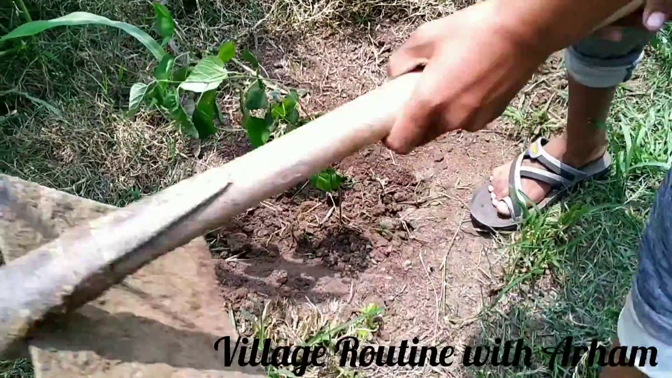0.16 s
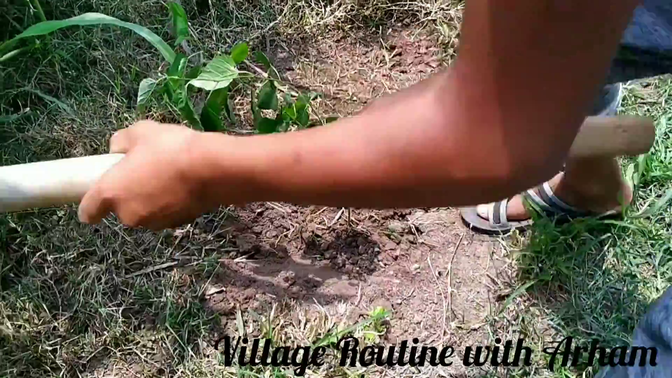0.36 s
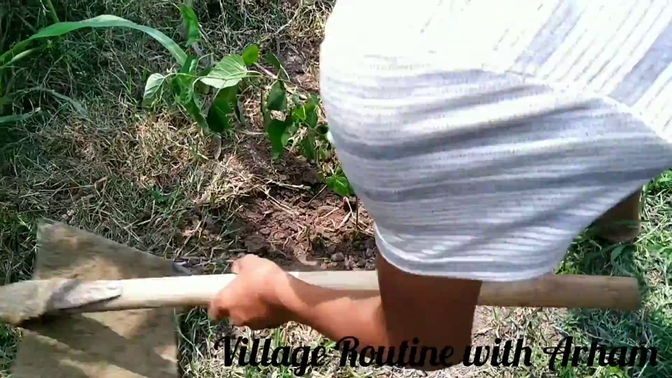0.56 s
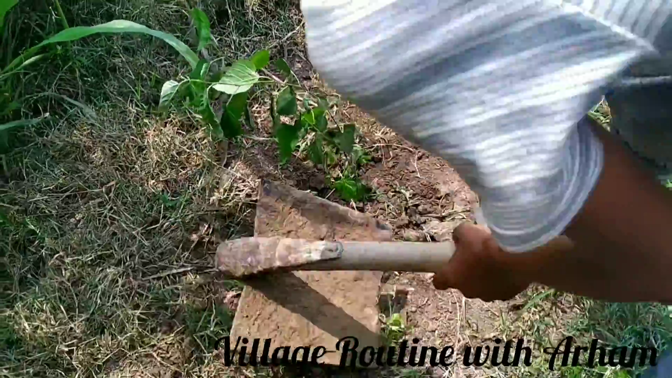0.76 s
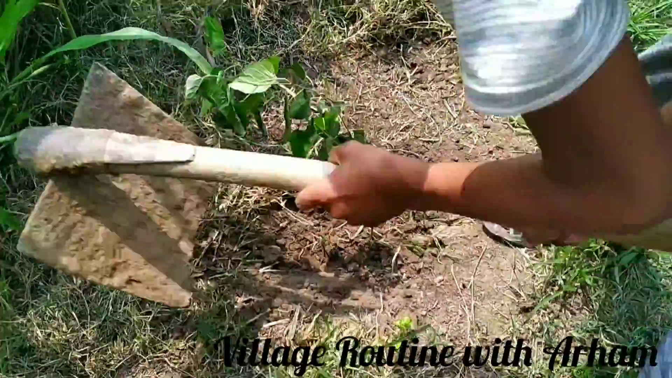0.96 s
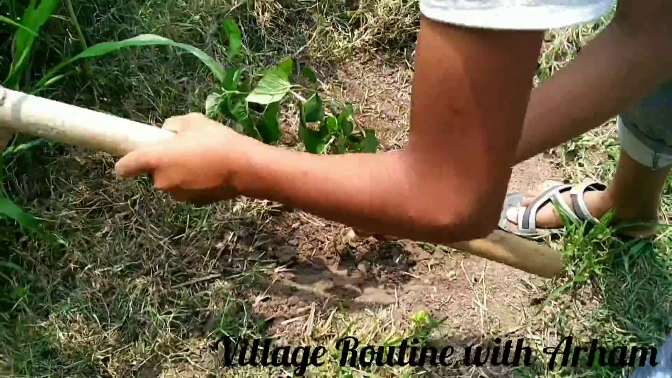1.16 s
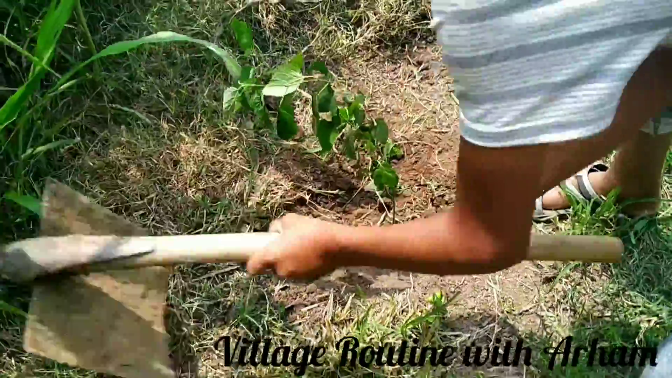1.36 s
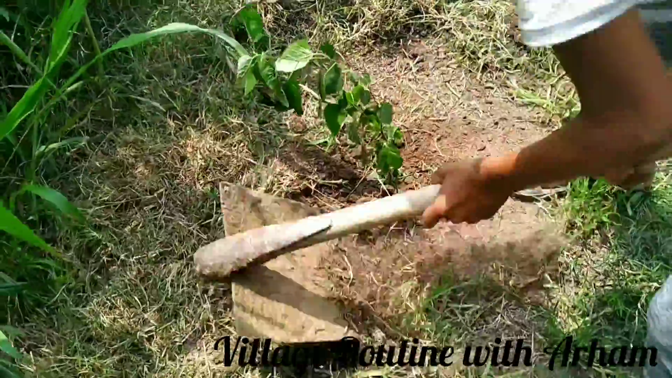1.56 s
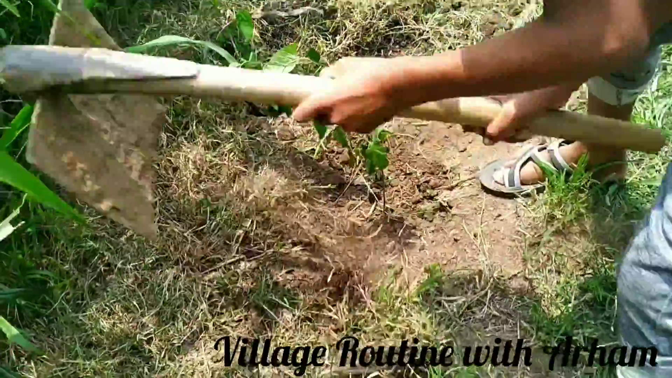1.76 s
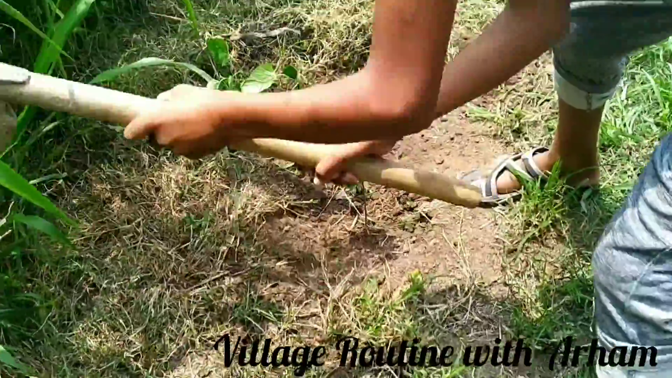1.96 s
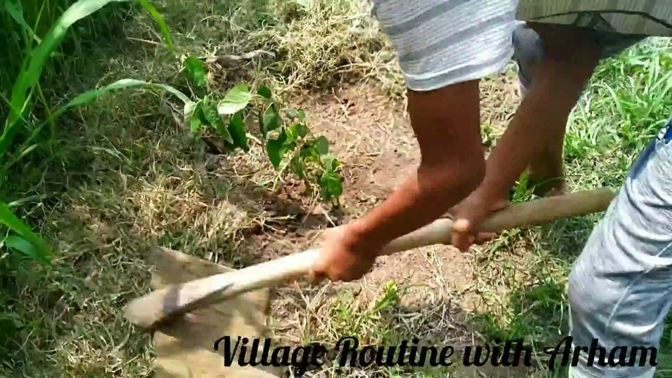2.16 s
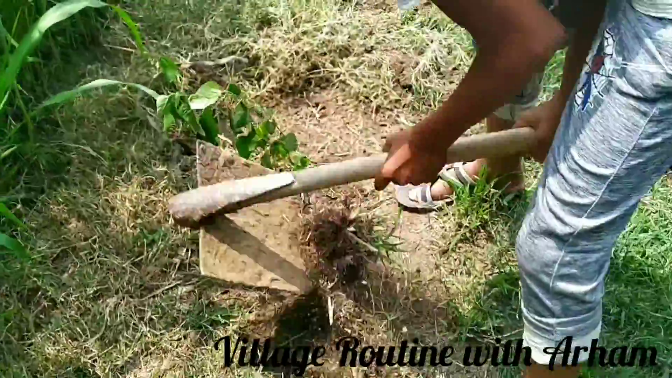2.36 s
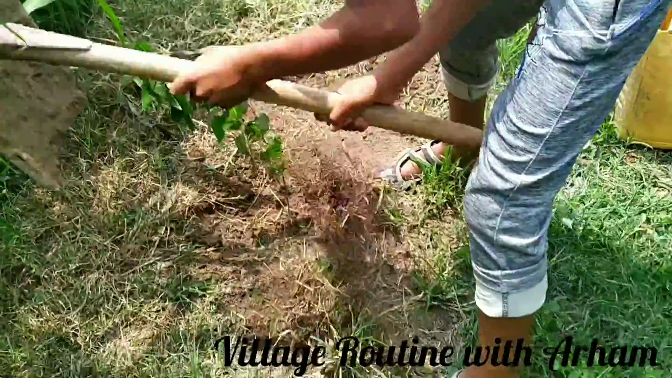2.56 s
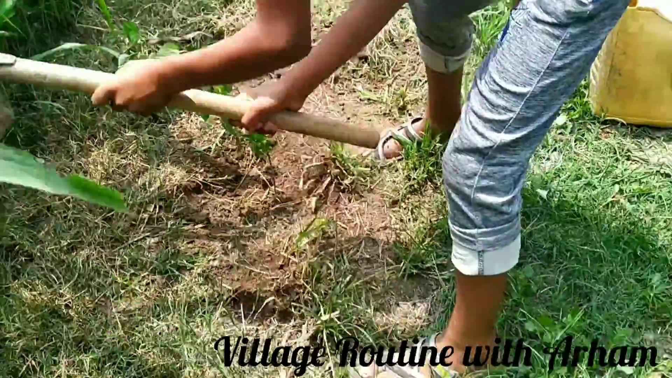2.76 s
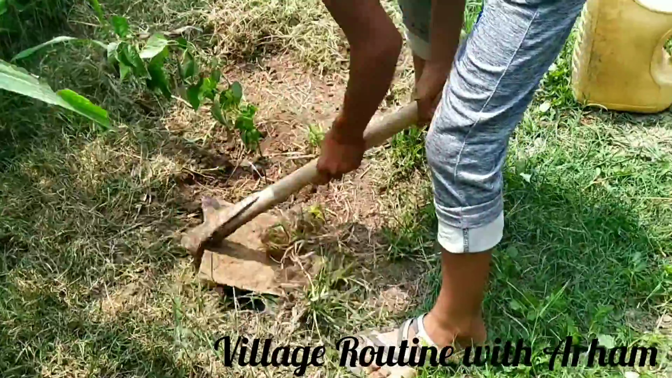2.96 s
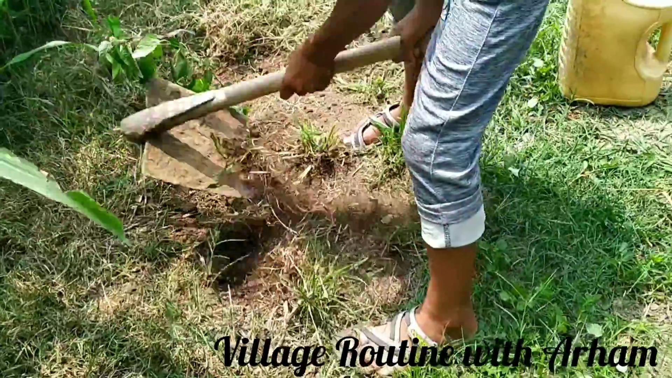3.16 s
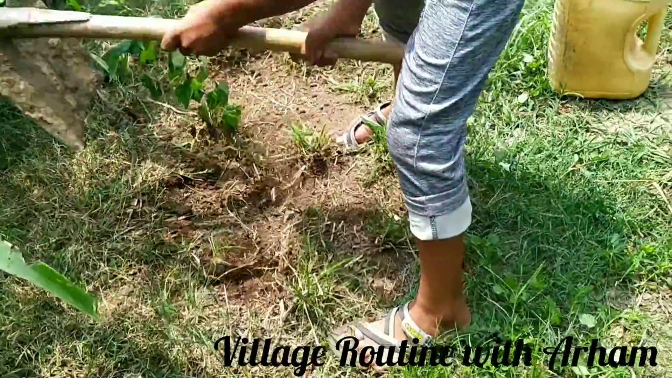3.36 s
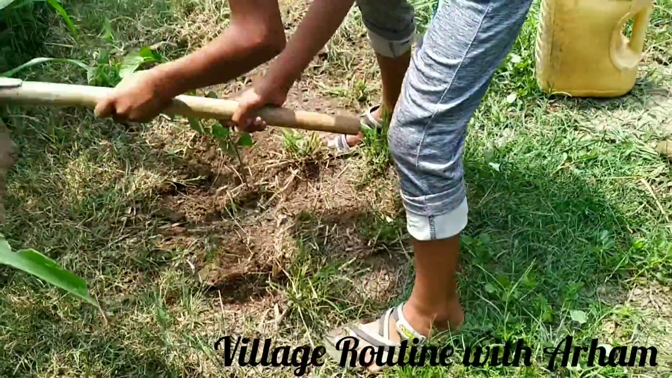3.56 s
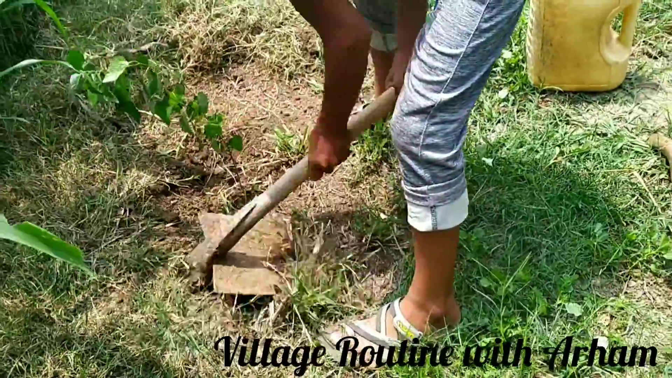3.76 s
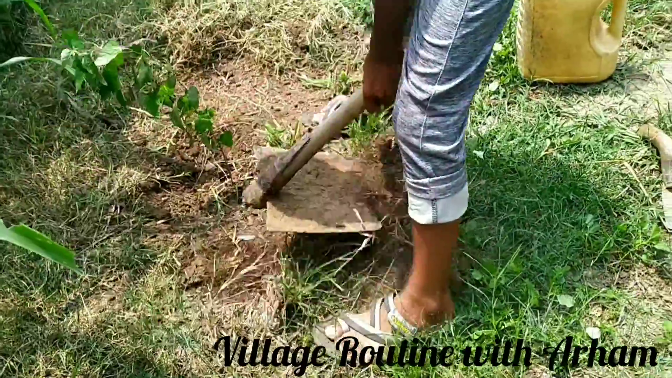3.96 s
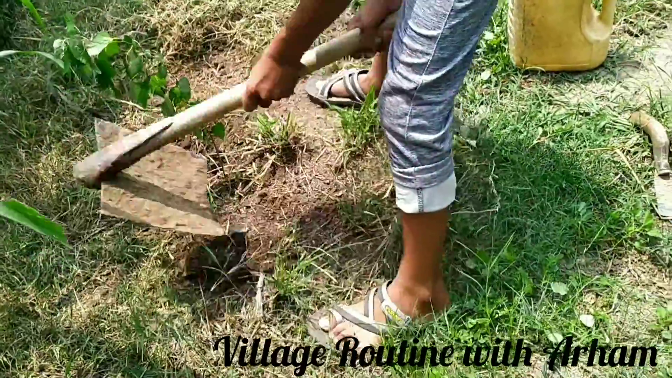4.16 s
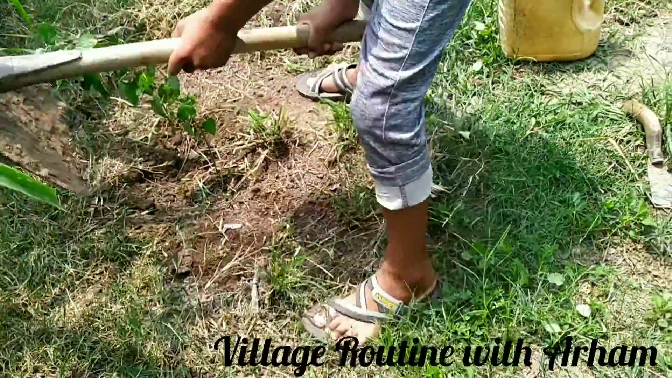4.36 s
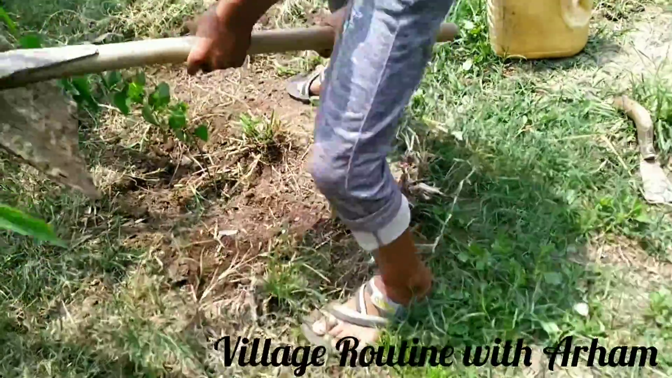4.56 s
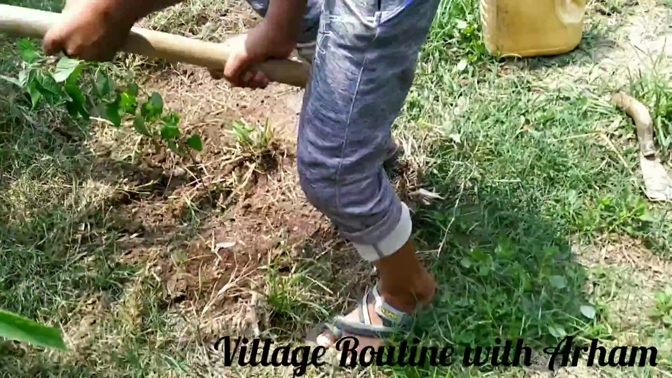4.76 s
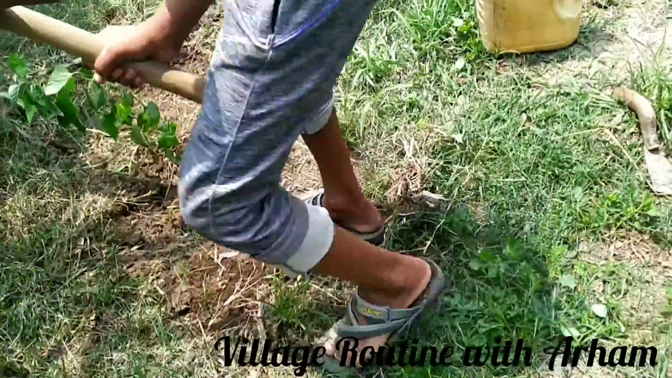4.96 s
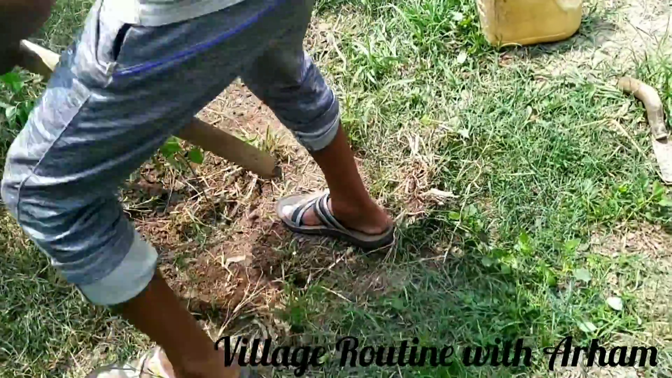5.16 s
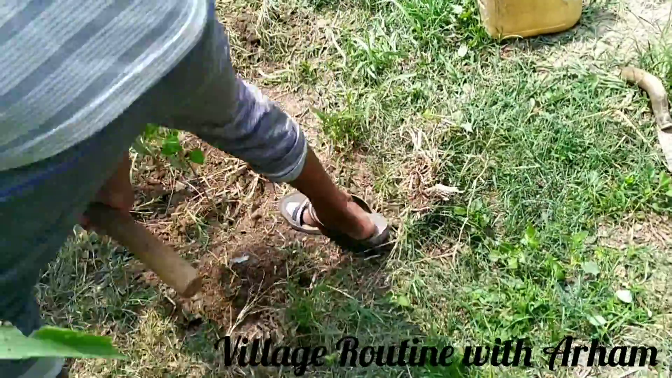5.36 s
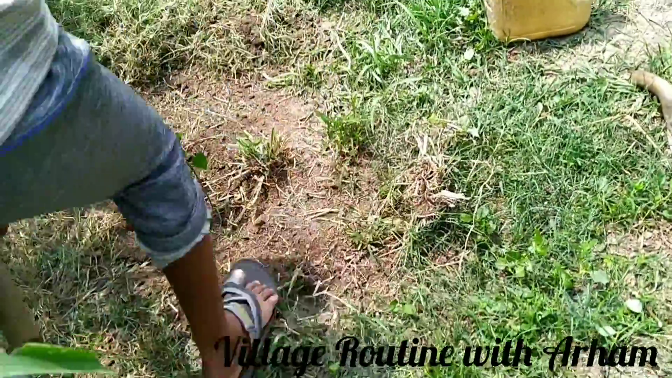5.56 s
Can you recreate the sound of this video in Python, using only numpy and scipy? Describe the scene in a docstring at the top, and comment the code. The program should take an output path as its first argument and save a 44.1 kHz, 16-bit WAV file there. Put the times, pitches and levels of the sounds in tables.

```python
"""A hand hoe chops five times into dry, grassy soil, close by and outdoors.
Each stroke swishes through the grass, crunches in with a dull thud, cracks the soil and throws earth.
The crunch is a crowd of tiny clicks, one for each break in the soil, and it makes the hoe ring briefly.
Sandals shuffle, dry grass rustles throughout, and there is a thin, high rasp like insects.
Far off, a slow one-cylinder engine thumps, one puff for each firing, over the rumble of the air."""
import sys
import numpy as np
from scipy import signal
from scipy.fft import rfft, irfft, next_fast_len
from scipy.io import wavfile
from scipy.ndimage import uniform_filter1d

SR = 44100
rng = np.random.default_rng(int(sys.argv[2]) if len(sys.argv) > 2 else 0)


def to_wav(s):
    """Save 16-bit WAV."""
    ch = np.atleast_2d(s).T  # columns
    pcm = np.round(np.clip(ch, -1, 1) * 32767)  # PCM
    wavfile.write(sys.argv[1], SR, pcm.astype(np.int16))


N = 246959
T, HZ = np.arange(N) / SR, np.fft.rfftfreq(N, 1 / SR)

# The blade bites and opens a small hollow. Each row: time in seconds, then
# the crunch's level in dB, rise and fall in seconds, brightness in dB per octave and top fizz in dB;
# the thud's level in dB, pitch in Hz, fall and delay in seconds;
# the ground's push in dB, pitch in Hz and heave in dB;
# the swish's level in dB, head start and build-up in seconds;
# the cut's lower resonance in Hz and its height in dB, its upper resonance in Hz and its height in dB;
# the place of a dip in the spectrum in Hz, and the gain of the hoe's ring in dB.
STROKES = [(0.661, -20, 0.008, 0.016, 1.5, 5.5, -21, 530, 0.00085, 0.00026, -45, 297, -50, -26.5, 0.027, 0.0085, 750, 10, 970, 13, 3380, -65),
           (1.486, -15.5, 0.0094, 0.0055, 2.5, -2, -19.5, 684, 0.004, 0.001, -22, 370, -28.5, -28, 0.043, 0.02, 455, 11, 2200, -6, 1810, -51.5),
           (2.247, -14.5, 0.0034, 0.011, 3, -1, -20.5, 566, 0.0086, 0.001, -31.5, 262, -37, -24.5, 0.071, 0.05, 370, -6, 1270, 8, 3300, -53),
           (2.997, -15.5, 0.0048, 0.008, 2.3, -4, -25, 372, 0.0062, 0.002, -34, 237, -34, -33, 0.067, 0.059, 534, 11.5, 1100, 9, 3350, -64),
           (3.799, -17.5, 0.0028, 0.012, 2.5, -1, -24, 560, 0.0068, 0.00066, -22.5, 301, -34, -29, 0.037, 0.018, 375, 16, 1350, 8.5, 2980, -74)]
# The tones of the steel blade on its wooden handle, damped by the soil.
# Each row: pitch in Hz, relative level in dB, seconds to fade by 60 dB.
HOE_TONES = [(373, 2, 0.16), (539, 2, 0.26), (840, 5, 0.14), (1104, -3, 0.062), (2520, 4, 0.03),
             (7370, 26.5, 0.0084)]
# Sharp cracks of dry soil as the blade bites in or breaks off clods.
# Each row: time in seconds, snap level in dB, snap fall in seconds, crumble level in dB,
# crumble fall in seconds, brightness in dB per octave, the gap's resonance in Hz, its height in dB.
SOIL_CRACKS = [(0.704, -33, 0.0035, -36.5, 0.015, 0.5, 990, 2),
               (0.737, -44, 0.003, -40.5, 0.019, 0.5, 850, 2),
               (1.514, -39, 0.003, -38, 0.015, -2.5, 560, 2),
               (1.533, -28, 0.0035, -30.5, 0.012, 1.4, 550, 9.5),
               (1.548, -37, 0.002, -43.5, 0.021, -2, 700, 7),
               (2.2685, -20.5, 0.0015, -35, 0.011, -0.7, 350, 2.5),
               (2.9935, -22, 0.0025, -37, 0.0091, -0.5, 1290, 8),
               (3.038, -24.5, 0.0054, -33, 0.017, 2.5, 1420, 5),
               (3.056, -36, 0.0022, -35, 0.013, 2, 1350, 8), (3.8214, -22, 0.0019, -33, 0.0071, 2, 1400, 3)]
# Showers of thrown earth. Each row: time of the peak in seconds, relative level in dB.
EARTH_SHOWERS = [(0.95, -56), (1.7, -54), (2.682, -54.5), (3.479, -48.5), (4.051, -45.5)]
# Hoe and sandals tap the ground. Each row: time in seconds, level in dB, rise and fall in seconds.
GROUND_TAPS = [(0.378, -33, 0.00068, 0.0024), (0.386, -32, 0.0031, 0.0036), (1.252, -46, 0.0014, 0.0046),
               (1.949, -45, 0.0016, 0.005), (4.891, -40, 0.0059, 0.0045)]
# Sandals and blade brush the grass.
# Each row: time in seconds, level in dB, rise and fall in seconds, brightness in dB per octave.
GRASS_SCUFFS = [(0.376, -39.5, 0.017, 0.014, -2.5), (0.446, -32, 0.0019, 0.0091, 12),
                (1.10, -39.5, 0.022, 0.025, 1), (3.255, -38, 0.01, 0.031, 6),
                (4.44, -40, 0.033, 0.029, -1.5), (4.69, -48, 0.0088, 0.0057, -1),
                (4.808, -40.5, 0.0061, 0.025, 0), (4.89, -41.5, 0.012, 0.019, -0.5),
                (5.297, -33.5, 0.019, 0.032, 4), (5.555, -38, 0.027, 0.035, 1.5)]
# How loud the rustle and the high rasp are over time. Each row: time in seconds, relative level in dB.
RUSTLE_LEVELS = [(0.27, -57.5), (0.42, -47.5), (0.6, -54), (2.1, -52), (2.9, -47), (3.7, -53.5),
                 (4.3, -51.5), (4.55, -44.5), (4.75, -50), (5.13, -51), (5.35, -47.5)]
RASP_LEVELS = [(0.15, -70), (0.5, -54), (0.8, -55.5), (1.35, -55), (1.85, -67), (2.05, -58), (2.55, -62),
               (3.3, -60), (4.3, -65), (5.5, -58)]
# The paths of the engine's sound across the field. Each row: delay in seconds, relative level in dB.
ENGINE_PATHS = [(0, 4.5), (0.0184, -4.5), (.0285, -49), (0.053, -7), (0.07, -7), (.084, -16)]
# The tone colour of breaking soil, falling crumbs, dry grass and outdoor air.
# Each row: frequency in Hz, relative level in dB.
SOIL_SPECTRUM = [(60, -12), (180, 0.5), (330, 5), (680, 5), (880, 1), (1100, 4), (1400, 3.5), (2000, -1),
                 (3200, -2), (4600, -2), (6000, -1), (7400, -2), (8200, -0.5), (9300, -6), (11500, -14),
                 (15500, -9)]
PATTER_SPECTRUM = [(200, -10), (700, -6.5), (2000, 0.5), (3000, 0.5), (4000, 3), (7500, 2), (9500, -6.5),
                   (15500, -8)]
GRASS_SPECTRUM = [(150, -7.5), (500, -7), (1000, -8), (1900, -3.5), (3000, -3.5), (4500, -6.5), (6000, -5),
                  (8100, -1.5), (9500, -8), (11500, -15.5), (15500, -5.5)]
AIR_SPECTRUM = [(25, -19), (42, -21), (58, 7), (125, 4), (165, -3.5), (300, -12), (600, -18), (1100, -18.5),
                (2000, -18.5), (5000, -52), (8100, -29), (10000, -63), (15500, -43)]
# How alike left and right sound. Each row: frequency in Hz, likeness (1 the same, -1 opposite).
STEREO_LIKENESS = [(100, 0.92), (300, 0.92), (550, 0.68), (900, 0.17), (1300, 0.08), (1750, -0.26),
                   (2400, 0.05), (3400, -0.09), (4500, 0.2), (5600, -0.35), (7000, 0.08), (15000, 0)]
# Which way the digging and the surroundings lean. Each row: frequency in Hz, left minus right in dB.
DIGGING_BALANCE = [(600, 0), (1500, 0.5), (4000, -1), (7500, 3), (9800, -5.5), (12000, -2.5), (15000, 0)]
AROUND_BALANCE = [(600, 0.5), (2000, 1), (3500, 4), (6300, 2), (8300, 2), (11200, -4.5), (15000, 2.5)]


def hoe_chops():
    """Grass parts ahead of the blade, the crust breaks, and the packed ground answers with a thud."""
    out, t = np.zeros((2, N)), np.arange(-SR // 3, SR // 3) / SR
    for (when, db, rise, fall, bright, fizz_db, thud_db, thud_hz, thud_fall, thud_delay,
         push_db, ground_hz, heave_db, swish_db, lead, build,
         lower_hz, lower_db, upper_hz, upper_db, dip_hz, ring_db) in STROKES:
        cut = lower_db * bump(lower_hz, octaves=0.12) + upper_db * bump(upper_hz, octaves=0.12)
        dip = -9 * bump(dip_hz, octaves=0.12)
        fizz = fizz_db * bump(13000, octaves=0.48)  # the finest breaks
        soil_shape = curve(SOIL_SPECTRUM) + tilt(bright) + cut + dip + fizz
        drag = amp(-17) * swell(t, rise, fall=0.028)  # the blade drags on through the cut
        force = np.hypot(swell(t, rise, fall), drag)
        breaks = clicks(per_s=30000, spread_db=2.0, size=len(t))
        crunch = amp(db) * colour(breaks, soil_shape) * force
        # The blade gathers more and more stems until it reaches the soil.
        stems = np.clip((t + lead) / build, 0, 1) ** 1.5 * np.clip(1 - t / 0.008, 0, 1)
        crackle = clicks(per_s=28000, spread_db=4.5, size=len(t))
        swish = amp(swish_db) * stems * colour(crackle, curve(GRASS_SPECTRUM) + dip + tilt(-1.06))
        grit = nearby_echoes(crunch + swish, echo_db=2.5, decay_s=0.0063)
        low = amp(thud_db) * hollow_thud(t - thud_delay, thud_hz, thud_fall, uneven=0.17)
        low += ground_heave(t, ground_hz, push_db, heave_db)
        centred_low = np.outer([1, 0], low)  # all in the middle, none in the side signal
        add(out, when, grit + amp(ring_db) * hoe_ring(crunch) + centred_low)
    return out


def hollow_thud(t, hz, fall, uneven):
    """The hollow under the blade sounds while coarse lumps give way in an uneven shudder."""
    shudder = unit(uniform_filter1d(rng.standard_normal(len(t)), size=30))
    phase = 2 * np.pi * np.cumsum(hz * (1 + uneven * shudder)) / SR
    return np.sqrt(2) * np.sin(phase) * swell(t, rise=0.0016, fall=fall)


def ground_heave(t, hz, push_db, heave_db, heave_s=0.0017):
    """The packed ground heaves once under the blow and settles in a few low swings."""
    heave = -t / heave_s * np.exp(-(t / heave_s) ** 2 / 2)
    settle = np.cos(2 * np.pi * hz * t) * swell(t, rise=0.0016, fall=0.0022)
    return amp(heave_db) * heave + amp(push_db) * settle


def hoe_ring(force):
    """Breaking soil makes the hoe ring; the soil's grip shifts each tone a little every time."""
    t = np.arange(force.shape[1]) / SR
    grip = 1 + 0.01 * rng.standard_normal(len(HOE_TONES))
    ring = sum(amp(db - 60 * t / fade_s) * np.cos(2 * np.pi * hz * shift * t)
               for (hz, db, fade_s), shift in zip(HOE_TONES, grip))
    return signal.oaconvolve(force, ring[None], axes=1)[:, :len(t)]


def nearby_echoes(sound, echo_db, decay_s):
    """Blade, legs and ground throw back very quick echoes, a new pattern for every stroke."""
    t = np.arange(SR // 50) / SR
    pattern = rng.standard_normal((2, len(t))) * np.exp(-t / decay_s)
    pattern /= np.linalg.norm(pattern, axis=1, keepdims=True)
    pattern = signal.sosfilt(signal.butter(2, 1800, "high", fs=SR, output="sos"), pattern)
    echoes = signal.oaconvolve(sound, pattern, axes=1)[:, :sound.shape[1]]
    return (sound + amp(echo_db) * echoes) / np.hypot(1, amp(echo_db))


def soil_cracks(ring_db):
    """Dry soil snaps, sounds in the gap and crumbles against the blade, making it ring."""
    out, t = np.zeros((2, N)), np.arange(-SR // 5, SR // 5) / SR
    for when, snap_db, snap_s, crumble_db, crumble_s, bright, gap_hz, gap_db in SOIL_CRACKS:
        shape = curve(SOIL_SPECTRUM) + tilt(bright) + gap_db * bump(gap_hz, octaves=0.3)
        snap = swell(t, rise=0.0014, fall=snap_s) * clicks(per_s=7000, spread_db=1.0, size=len(t))
        crumbs = swell(t, rise=0.004, fall=crumble_s) * clicks(per_s=2500, spread_db=1.5, size=len(t))
        earth = colour(amp(snap_db) * snap + amp(crumble_db) * crumbs, shape)
        add(out, when, earth + amp(ring_db) * hoe_ring(earth))
    return out


def falling_earth(gain_db):
    """Fine crumbs rain on the grass in a shower that builds and thins out after each stroke."""
    showers = sum(amp(db) * swell(T - when, rise=0.13, fall=0.061) for when, db in EARTH_SHOWERS)
    crumbs = colour(clicks(per_s=9000, spread_db=2.2), curve(PATTER_SPECTRUM))
    return amp(gain_db) * showers * patchy(crumbs)


def knocks(db_per_octave):
    """A light touch of hoe or sandal crushes a little of the crust."""
    rows = [(when, db, rise, fall, db_per_octave) for when, db, rise, fall in GROUND_TAPS]
    return bursts(rows, SOIL_SPECTRUM, per_s=12000, spread_db=1.3)


def scuffs():
    """Dry stems crackle briefly as a sandal or the blade brushes past."""
    return bursts(GRASS_SCUFFS, GRASS_SPECTRUM, per_s=6000, spread_db=-2.5)


def grass_rustle(gain_db):
    """Dry stems keep crackling softly as they are stirred."""
    level_db = np.interp(T, *np.transpose(RUSTLE_LEVELS)) + gain_db
    crackle = colour(clicks(per_s=9000, spread_db=2.2), curve(GRASS_SPECTRUM))
    return amp(level_db) * patchy(crackle)


def insect_rasp(hz, waver_db, wander_hz):
    """A thin, high rasp comes and goes and wanders in pitch, like far insects."""
    waver, wander = (unit(uniform_filter1d(uniform_filter1d(noise, size=3000), size=1500))
                     for noise in rng.standard_normal((2, N)))
    band = colour(clicks(per_s=1500, spread_db=2.5), 55 * bump(hz, octaves=0.13))
    pitch_slide = np.exp(2j * np.pi * np.cumsum(wander_hz * wander) / SR)
    rasp = (signal.hilbert(band, next_fast_len(N))[:, :N] * pitch_slide).real
    level_db = np.interp(T, *np.transpose(RASP_LEVELS)) + waver_db * waver
    return amp(level_db) * rasp


def far_engine(gain_db, firings_per_s, puff_hz, puff_s, pipe_hz, pipe_db, pipe_s, uneven_db, scatter_db):
    """Each firing rings the exhaust pipe and sends a low puff over the field by several paths."""
    out, t = np.zeros((2, N)), np.arange(-SR // 4, SR // 4) / SR
    puffs = sum(amp(db) * np.exp(-((t - late) / puff_s) ** 2 / 2)
                * -np.cos(2 * np.pi * puff_hz * (t - late)) for late, db in ENGINE_PATHS)
    pipe = amp(pipe_db) * (t > 0) * np.exp(-abs(t) / pipe_s) * np.sin(2 * np.pi * pipe_hz * t)
    beat = puffs - pipe
    first_beat_s, slip_s = 0.098, 0.00017
    for when in np.arange(first_beat_s - 1 / firings_per_s, T[-1], 1 / firings_per_s):
        strength, slip = rng.standard_normal(2)
        add(out, when + slip_s * slip, amp(gain_db + uneven_db * strength) * np.array([beat, beat]))
    # Sound scattered on the way blurs into a steady murmur.
    scatter = unit(signal.oaconvolve(rng.standard_normal((2, N)), beat[None], "same", axes=1))
    return out + amp(gain_db + scatter_db) * scatter


def air(db):
    """The open air gives a steady rumble with a thin hiss."""
    return amp(db) * colour(rng.standard_normal((2, N)), curve(AIR_SPECTRUM))


def clicks(per_s, spread_db, size=N):
    """Tiny breaks make two rows of random clicks of uneven size: with a positive spread most are small and a
    few large, with a negative spread most are full size and a few smaller."""
    height = amp(spread_db * np.minimum(rng.exponential(1, size), 4))
    happens = rng.random(size) < per_s / SR
    return unit(height * happens * rng.standard_normal((2, size)))


def bursts(rows, spectrum, per_s, spread_db):
    """Makes one short shower of clicks for each row."""
    out, t = np.zeros((2, N)), np.arange(-SR // 5, SR // 5) / SR
    for when, db, rise, fall, bright in rows:
        crackle = colour(clicks(per_s, spread_db, size=len(t)), curve(spectrum) + tilt(bright))
        add(out, when, amp(db) * swell(t, rise, fall) * crackle)
    return out


def patchy(crackle, depth_db=3.5):
    """Makes a crackle louder and softer in small patches of time and frequency."""
    cells = signal.stft(crackle, nperseg=512)[2]
    noise = rng.standard_normal(cells.shape[1:])
    patches = unit(uniform_filter1d(uniform_filter1d(noise, size=7, axis=0), size=7, axis=1))
    return unit(signal.istft(cells * amp(depth_db * patches))[1][:, :N])


def swell(t, rise, fall):
    """Builds up to time zero and then lets go; rise and fall are in seconds."""
    return np.exp(-abs(t / np.where(t < 0, rise, fall)) ** 1.14 / 2)


def colour(sound, db):
    """Filters a sound by a dB curve; white noise keeps its power."""
    taps = np.roll(irfft(amp(db)), 1024)[:2049] * np.hanning(2049)
    return signal.oaconvolve(sound, taps[None] / np.linalg.norm(taps), "same", axes=1)


def curve(points):
    """Joins a table's points into a curve over all frequencies, with octaves evenly spaced."""
    hz, value = np.transpose(points)
    return np.interp(np.log(HZ + 1), np.log(hz), value)


def tilt(db_per_octave):
    """A slope that brightens or dulls a sound, pivoting at 4000 Hz."""
    return db_per_octave * np.log2(np.maximum(HZ, 300) / 4000)


def bump(hz, octaves):
    """A bell-shaped hill around one frequency."""
    return np.exp(-(np.log2((HZ + 1) / hz) / octaves) ** 2)


def amp(db):
    """Turns decibels into a gain."""
    return 10 ** (np.asarray(db) / 20)


def unit(x):
    """Scales a signal to an average power of 1."""
    return x / np.sqrt(np.mean(x ** 2) + 1e-20)


def add(mix, when, sound):
    """Mixes in a sound with its middle at the given time in seconds."""
    start = round(when * SR) - sound.shape[1] // 2
    part = mix[:, max(start, 0):start + sound.shape[1]]
    part += sound[:, max(-start, 0):][:, :part.shape[1]]


def stereo(pair, balance):
    """Turns a middle and a side signal into left and right: alike in the bass, unlike in the treble."""
    size = next_fast_len(N)
    hz = np.fft.rfftfreq(size, 1 / SR)
    likeness = np.clip(np.interp(hz, HZ, curve(STEREO_LIKENESS)), -1, 1)
    lean_db = np.interp(hz, HZ, curve(balance))
    mid, side = rfft(pair, size) * np.sqrt([(1 + likeness) / 2, (1 - likeness) / 2])
    return irfft([(mid + side) * amp(lean_db / 2), (mid - side) * amp(-lean_db / 2)], size)[:, :N]


def scene():
    """Puts the digging straight ahead, grass, air and rasp around it, and the engine far behind."""
    digging = hoe_chops() + soil_cracks(ring_db=-56.5) + knocks(db_per_octave=-1.6)
    grass = scuffs() + grass_rustle(gain_db=3.0) + falling_earth(gain_db=5.0)
    engine = far_engine(gain_db=-41.0, firings_per_s=9.18, puff_hz=97.5, puff_s=0.0055,
                        pipe_hz=72.85, pipe_db=-8.5, pipe_s=0.079, uneven_db=-2.0, scatter_db=-23)
    around = grass + air(db=-48.5) + insect_rasp(hz=8040, waver_db=3, wander_hz=70)
    return stereo(digging, DIGGING_BALANCE) + stereo(around, AROUND_BALANCE) + engine


def record(dry, low_hz=45, top_hz=15980):
    """Turns down the deepest bass and cuts off the highest treble."""
    size = 2 * next_fast_len(N)
    hz = np.fft.rfftfreq(size, 1 / SR)
    bass_cut = 1 - 0.71 / (1 + (hz / low_hz) ** 8)
    thinned = irfft(rfft(dry, size) * bass_cut)[:, :N]
    treble_cut = signal.firwin(511, top_hz, window=("kaiser", 9), fs=SR)
    return signal.oaconvolve(thinned, treble_cut[None], "same")


dry = scene()
out = record(dry)
to_wav(out)
```